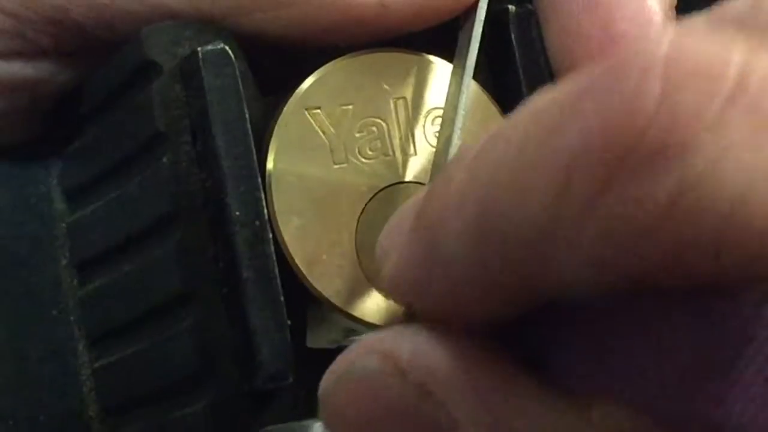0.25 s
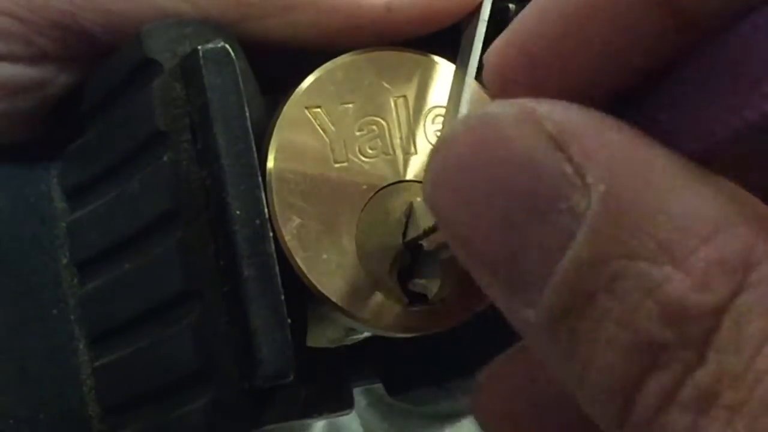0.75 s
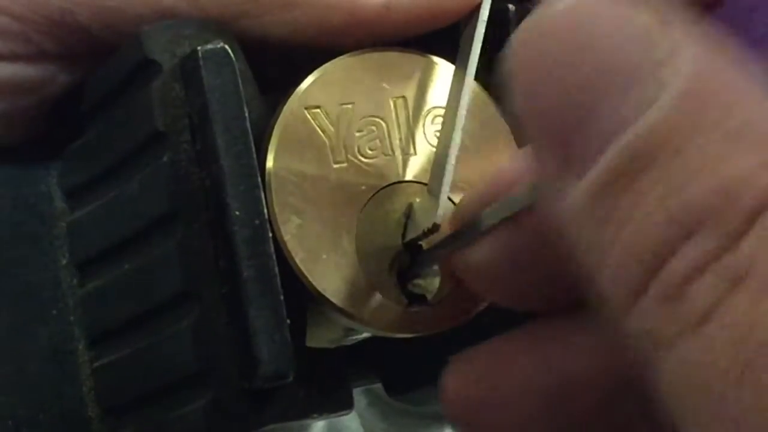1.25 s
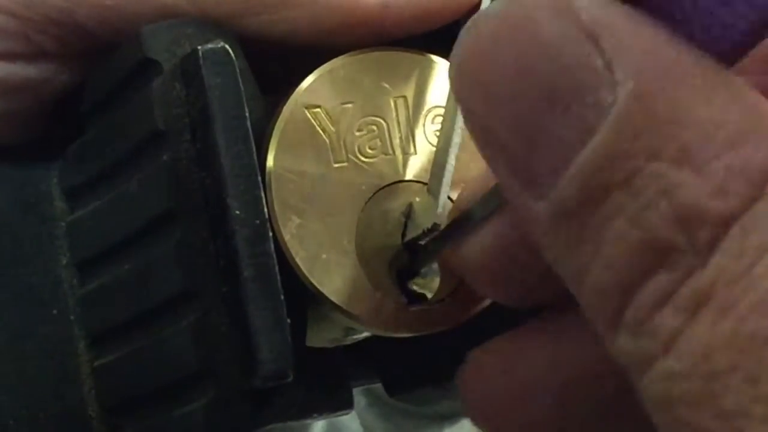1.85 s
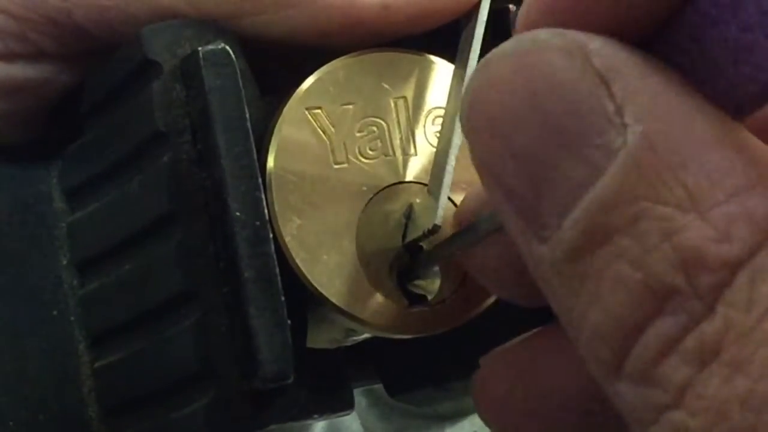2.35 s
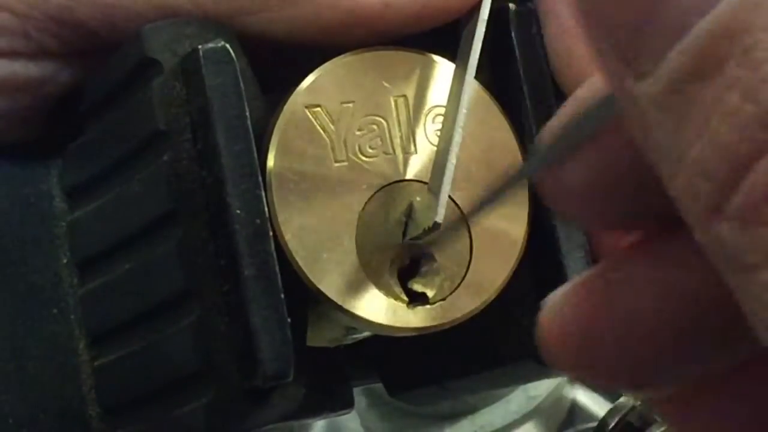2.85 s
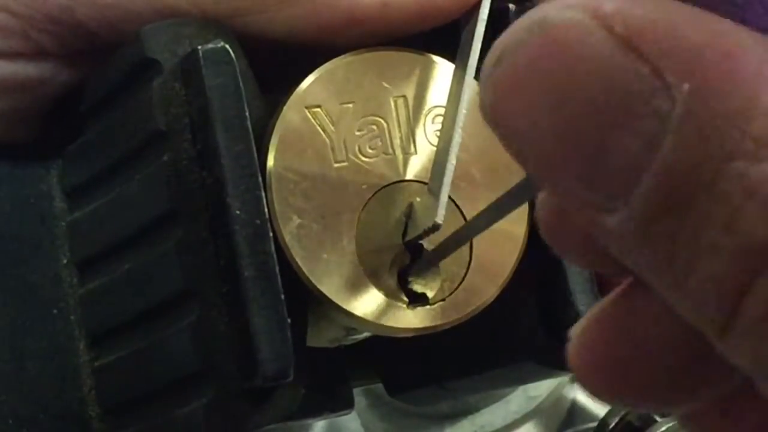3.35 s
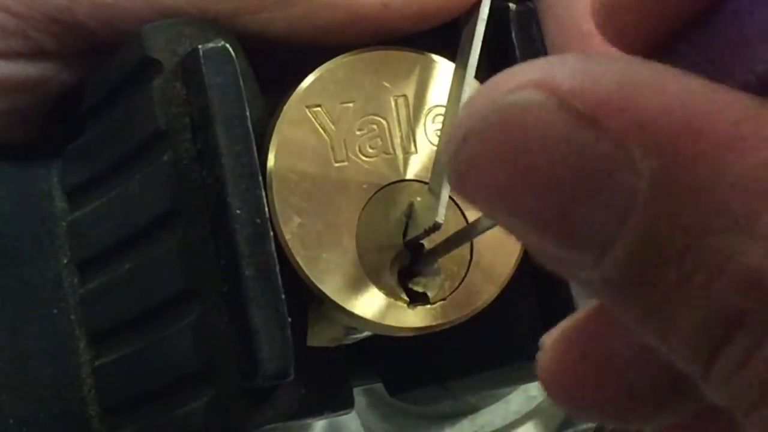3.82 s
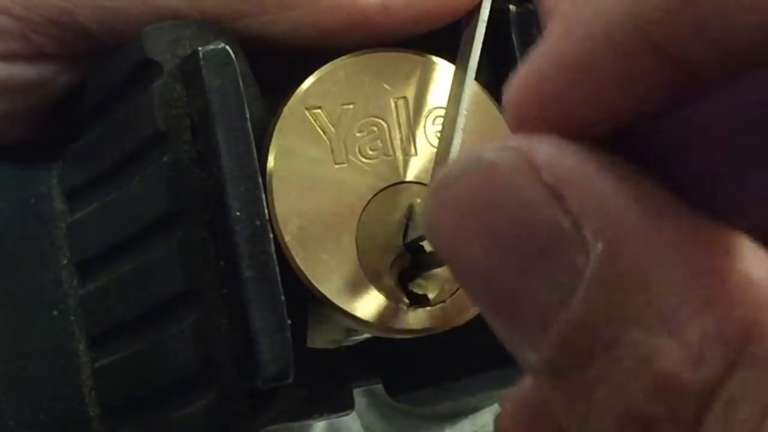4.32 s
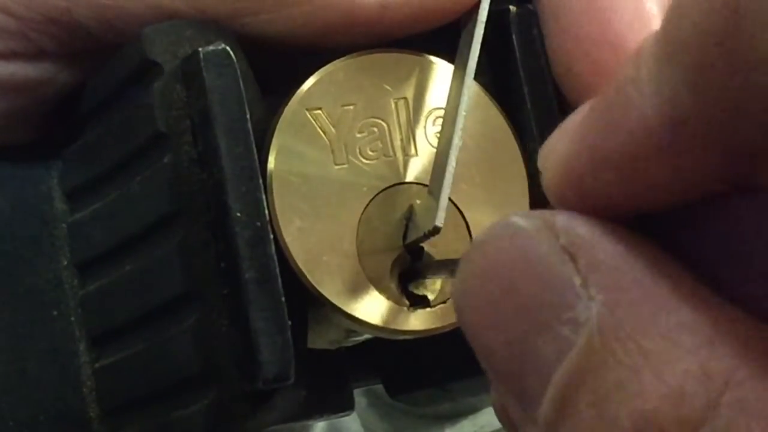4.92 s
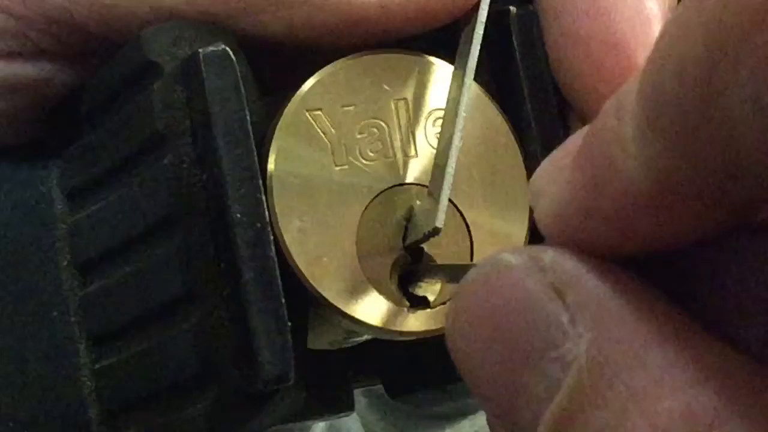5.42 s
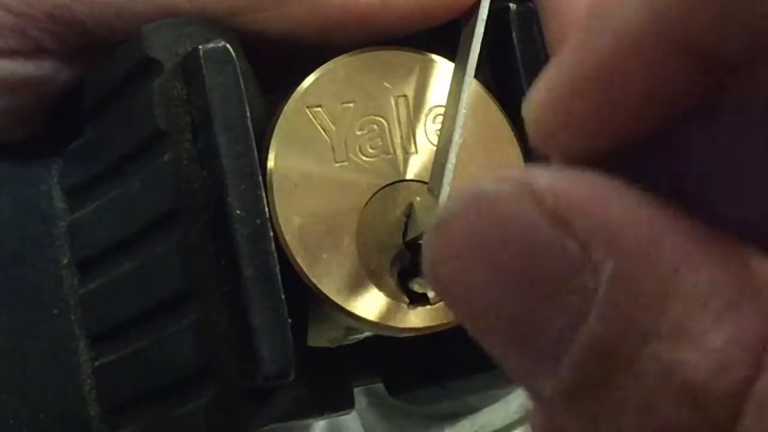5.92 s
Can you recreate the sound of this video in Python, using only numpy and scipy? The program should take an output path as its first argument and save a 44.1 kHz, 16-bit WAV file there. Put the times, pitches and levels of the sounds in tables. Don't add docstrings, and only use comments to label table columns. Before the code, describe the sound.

Close, dry metallic ticks and sharp pin snaps from a lock being picked, sparse and uneven, above faint steady hum and soft hiss.

```python
import sys
import numpy as np
from scipy import signal
from scipy.fft import rfft, irfft, next_fast_len
from scipy.io import wavfile
from scipy.ndimage import uniform_filter1d, map_coordinates

SR = 44100
rng = np.random.default_rng(int(sys.argv[2]) if len(sys.argv) > 2 else 0)


def file_out(sig):
    cols = np.atleast_2d(sig).T
    lim = np.clip(cols, -1, 1)
    pcm = np.round(lim * 32767).astype(np.int16)
    wavfile.write(sys.argv[1], SR, pcm)


def rack_gain(trim_db):
    fader = np.asarray(trim_db, float)
    return 10 ** (fader / 20)


N = 272097

# start in seconds, peak in dB, chatter in dB, chatter
# t60 in seconds, room answer in dB.
SNAPS = [(0.4115, -28.5, -24, .008, -21), (0.7372, -24.5, -28, 0.006, -19), (2.2009, -25, -22, 0.013, -22),
         (2.5618, -15, -27, 0.007, -22), (2.9838, -31.5, -25, 0.008, -23), (4.2066, -26.5, -24, 0.009, -19),
         (4.7535, -19.5, -25, 0.01, -23)]
MORE_SNAPS = [(3.2835, -35, -28.5, .006, -26), (3.3076, -28.5, -14, 0.0099, -34),
              (3.7416, -15.5, -22, 0.0068, -16), (3.7433, -10.5, -19, 0.0089, -30),
              (3.7906, -31.5, -18, 0.007, -24), (3.7936, -32.5, -24, .007, -27),
              (4.4323, -59.5, -22, 0.0056, -21)]
# resonance in Hz, width in Hz, level in dB.
STACKS = [
    [(2990, 200, -19), (3900, 200, -15), (4800, 200, -23), (6930, 290, -5.5), (8370, 300, -10),
     (9800, 340, -8), (10900, 400, -7), (12400, 650, -9), (13400, 300, -13), (14500, 360, -7),
     (15400, 550, 0)],
    [(3100, 180, -8), (3680, 340, -1.5), (7540, 740, -19), (9170, 1200, 5.5), (10600, 340, -2),
     (14070, 1100, 1), (15200, 900, -10)],
    [(2680, 230, 6.5), (2915, 150, 13), (4700, 210, -15), (5480, 310, 8.5), (5940, 320, 7.5),
     (6900, 300, -12), (8570, 500, -2), (9830, 350, -4), (10400, 370, -5.5), (11140, 440, 4),
     (11700, 490, 1), (12540, 500, 5), (13490, 400, -5), (15300, 390, -9)],
]
LATER_STACKS = [
    [(1925, 210, -15), (2950, 280, -14.5), (5500, 200, -7.5), (7275, 240, -13.5), (8520, 360, -14),
     (10560, 610, -8.5), (11640, 620, -8), (12000, 520, 2.5), (13100, 240, -19), (15200, 280, -24)],
    [(1530, 110, -5), (4370, 220, -15.5), (6730, 240, -5), (9000, 560, -11), (11200, 600, -11),
     (11850, 340, -20), (13350, 440, -14), (15450, 1330, -18.5)],
    [(2940, 570, -19), (5600, 440, -10), (7000, 650, 8.5), (8200, 520, 1), (11300, 540, -20),
     (15300, 860, 3), (15500, 410, 2)],
    [(1965, 180, 5), (2830, 110, 4.5), (2990, 130, 7), (4050, 190, 3), (5220, 250, 7), (6060, 200, -4),
     (7880, 150, -19), (8400, 80, 5), (9540, 640, -0.5), (10450, 260, -7.5), (10460, 220, 0),
     (12550, 750, 3.5), (14450, 400, -25), (15200, 300, -28)],
]
MORE_SNAP_STACKS = [
    [(3070, 310, -18), (7400, 300, -1), (10000, 230, -21), (11900, 350, 0), (12100, 330, -7)],
    [(3070, 150, -5), (4400, 220, -4), (6340, 420, -2), (7380, 440, 3), (7800, 350, 0), (8500, 210, 1),
     (13000, 370, -9), (14400, 370, -15), (14600, 230, -9)],
    [(6100, 1220, -3), (13840, 1580, -0.5)],
    [(1960, 140, -25), (3050, 230, -7), (4140, 270, -10), (7100, 540, -3.5), (8060, 940, 4.5),
     (11940, 340, -7), (12500, 570, -2.5), (15200, 1040, -11.5)],
    [(7360, 650, -12), (9500, 600, -2), (11900, 630, -6), (14800, 720, -9)],
    [(3550, 540, -14), (6910, 650, -10), (9480, 500, -4), (12100, 750, -11), (14840, 650, -10.5)],
    [(2800, 300, -3.5), (5350, 260, 0)],
]


def snaps():
    for event, peaks in zip(SNAPS + MORE_SNAPS, STACKS + LATER_STACKS + MORE_SNAP_STACKS):
        s, peak_db, chatter_db, chatter_t60, room_db = event
        struck = stack_ring(peaks, widen=0.98, rise_cycles=1.76)
        chance = rng.standard_normal(SR // 50)
        yield s, rack_gain(peak_db) * chattering(struck, chance, chatter_db, chatter_t60), room_db


# start in seconds,
# peak in dB.
REBOUNDS = [(.7370, -37), (2.2014, -32), (2.2011, -26), (2.201, -28.5), (2.2027, -35), (2.5614, -27.5),
            (2.5629, -31), (3.284, -39), (3.3069, -31), (3.7428, -26), (4.75404, -22), (4.7558, -38),
            (2.2043, -38), (2.5632, -26), (2.5643, -33), (3.31, -38), (3.312, -35), (3.7438, -27),
            (4.7549, -38)]


def rebounds():
    snap_times = np.array([snap[0] for snap in SNAPS + MORE_SNAPS])
    stacks = STACKS + LATER_STACKS + MORE_SNAP_STACKS
    for s, peak_db in REBOUNDS:
        nearest = stacks[np.argmin(np.abs(s - snap_times))]
        peaks = [p for p in nearest if p[0] > 6300]
        struck = stack_ring(peaks, widen=1.28, rise_cycles=1.4)
        chance = rng.standard_normal(SR // 50)
        yield s, rack_gain(peak_db) * chattering(struck, chance, chatter_db=-22, chatter_t60=0.0059), -22


def stack_ring(peaks, widen, rise_cycles):
    t = np.arange(SR // 50) / SR
    hz, width, db = np.transpose(peaks)[:, :, None]
    decay = rack_gain(db) * width * np.exp(-np.pi * widen * width * t)
    rise = (1 - np.exp(-t * hz / rise_cycles)) ** 2
    return (decay * np.sin(2 * np.pi * hz * t) * rise).sum(0) * spiked(t)


# start in seconds, peak in dB, place (0 plug, 1 pins, 2 shaft, 3 tip),
# loss in dB per part away from that place, housing in dB relative to the peak.
TAPS = [(.7354, -46, 2.7, 1, -20), (.7398, -44, 1, 8, -13.5), (.7628, -46, 1.3, 3, -8),
        (.8385, -35, 1.9, 11, -40), (.7334, -61, 0.86, 2, -15), (2.9726, -43, 1.2, 2, -24),
        (3.4855, -64, .5, 3, -8), (3.2948, -44, .8, 12, -26), (3.3055, -46, 2.8, 6, -24),
        (3.99, -53, 4.5, 3, -6), (3.4112, -40, 2.2, 6, -36), (3.416, -43, 1, 18, -26),
        (3.4387, -38, 2.3, 7, -42), (3.5411, -41, 2.3, 7, -27), (5.966, -68, .5, 5, -1),
        (6.0, -65, 2.6, 8, -15), (3.7604, -27.5, 3.6, 2.5, -26.5), (3.7644, -32, 1.6, 2.5, -18),
        (.7925, -55, 1.5, 6, -13), (3.5517, -63, .3, 6, -9), (3.9995, -52, 0.92, -4, -11.5),
        (4.2043, -37, 2.2, 2, -27), (4.4325, -67, .1, 6, -3), (4.4583, -69, .1, 1, 11)]
# start in seconds, peak in dB, place (as for taps), housing in dB.
CATCHES = [(0.4134, -53, 1.5, -5), (0.7994, -47, 1.1, -26), (.8045, -47, .5, -26), (0.816, -47, .8, -21),
           (1.399, -55, 2.3, -14), (1.6085, -59, 1.9, -13), (2.8301, -60, 1.6, -22), (2.8, -49, 2.1, -21),
           (2.8066, -42, 2.1, -19), (2.813, -46, 1.9, -20), (2.8218, -40, 2.2, -28),
           (2.8367, -38, 2.1, -37), (2.8503, -36, 2.3, -38), (2.8524, -42, 2.1, -30),
           (2.8583, -43, 2.1, -38), (2.8657, -58, 1.5, -21), (2.87, -52, 1.3, -8), (2.8772, -43, 1.6, -12),
           (3.312, -44, 1.6, -17), (3.7544, -38, 2.2, -23), (3.7582, -43, 1.5, -13),
           (4.0055, -40, 2.1, -16), (4.007, -51.5, .9, -5), (4.037, -47, 1.9, -18), (4.2124, -47, .1, -17),
           (6.0412, -47.5, 0.43, -13), (6.0566, -58, .1, -4), (6.0904, -44, 2.6, -26),
           (6.0934, -44, 2.2, -22), (6.165, -55, 1.1, -19), (.8142, -51, 1.4, -17), (.832, -56, .9, -17),
           (2.7945, -58, 2.9, -18), (2.8345, -51, 2.2, -30), (2.855, -50, 2.1, -25),
           (3.3028, -50, 3.1, -25), (3.4137, -52, 1.6, -24), (3.441, -56, .7, -22),
           (3.7675, -43, 1.2, -10.5), (6.011, -66, .1, -15), (6.098, -60, 2.1, -12),
           (6.1457, -61, 2.7, -20), (6.155, -57, .2, -20), (6.1685, -52, 1.9, -11), (2.838, -43, .3, -29),
           (2.8506, -51, .2, -22), (2.8064, -52, .1, -20), (6.0414, -54, 3.2, -30)]


def light_contacts():
    rows = TAPS + [(s, db, place, 10.5, housing_db) for s, db, place, housing_db in CATCHES]
    contacts = []
    for s, peak_db, place, loss_db, housing_db in rows:
        parts_db = peak_db - loss_db * np.abs(np.arange(4) - place)
        contacts.append((s, peak_db + housing_db, *parts_db))
    return contacts


# mode in Hz, level in dB, t60 in seconds.
HOUSING = [(1950, -0.5, 0.037), (2990, 10, 0.0077), (4200, 7.5, 0.0077)]
PLUG = [(5556, 1.5, 0.0055), (6830, 3.5, 0.011), (7140, 4, 0.012)]
PINS = [(7880, -1.5, 0.0037), (8330, -0.5, 0.0036), (9750, -4.5, 0.0032)]
SHAFT = [(10870, -7.5, 0.0018), (11650, 4.5, 0.0039), (12520, 4, 0.0035)]
TIP = [(13730, 1, 0.0022), (14300, -2.04, 0.003), (15660, 0.5, 0.0022)]


def taps():
    parts = (HOUSING, PLUG, PINS, SHAFT, TIP)
    rises_s = (0.00062, 0.00017, 0.00032, 0.000077, 0.000062)
    for s, *levels_db in light_contacts():
        sound = 0
        for modes, db, rise_s in zip(parts, levels_db, rises_s):
            chance = rng.standard_normal(6 + SR // 50)
            struck = ring(modes, chance, rise_s, detune=0.023, scatter_db=2.5)
            sound = sound + rack_gain(db + 1.5) * chattering(struck, chance, chatter_db=-19, chatter_t60=0.0076)
        yield s, sound, -22


def ring(modes, chance, rise_s, detune, scatter_db):
    t = np.arange(SR // 50) / SR
    hz, db, t60 = np.transpose(modes)[:, :, None]
    pitch, size = chance[:6].reshape(2, 3, 1)
    decay = rack_gain(db + scatter_db * size - 60 * t / t60)
    each = decay * np.sin(2 * np.pi * hz * (1 + detune * pitch) * t)
    rise = (1 - np.exp(-t / rise_s)) ** 2
    return each.sum(0) * spiked(t) * rise


def spiked(t):
    return 1 + rack_gain(4) * np.exp(-(t / .00025) ** 2)


def chattering(sound, chance, chatter_db, chatter_t60):
    force = rack_gain(chatter_db - 60 * np.arange(len(chance)) / SR / chatter_t60) * chance
    x = np.convolve(np.append(1, force), sound)
    return x / np.abs(x).max()


def clicks():
    dry, wet = np.zeros((2, N + SR))
    for s, blow, room_db in [*taps(), *snaps(), *rebounds()]:
        start = round(s * SR)
        crack = blow * rack_gain(-60 * np.arange(len(blow)) / SR / 0.0043)
        answer = signal.fftconvolve(crack, room_tail(delay_s=.006))
        answer *= np.linalg.norm(blow) / np.linalg.norm(crack)
        dry[start:][:len(blow)] += blow
        wet[start:][:len(answer)] += rack_gain(room_db - 1.5) * answer
    return dry[:N], wet[:N]


# start in seconds, length in seconds,
# scrape in dB at the start, gain in dB by the end, pick in dB over the brass.
STROKES = [(0.7332, .011, -58, 1, -3), (0.742, 0.1, -65, -3.5, -7), (1.3, .03, -82, -1, 3),
           (1.373, .025, -83, -2.5, 7.5), (1.585, .03, -86, 3, 3), (2.789, .042, -73.5, 9, 9),
           (2.851, 0.025, -60.5, -1, 7.5), (2.537, 0.026, -79.5, 8, 1), (2.979, 0.01, -71.5, 7, -5),
           (3.282, 0.021, -65.5, 7, 3), (3.298, 0.0144, -64.5, 2, -4), (3.411, 0.006, -53.5, -5, 5.5),
           (3.437, 0.057, -70, -14.5, 3.5), (3.749, .008, -65, -10, -6.5), (3.752, 0.016, -60.5, 8, 1.5),
           (3.771, .02, -84.5, -8.5, 11), (3.79, .007, -69, -3, 6), (3.974, 0.03, -81.5, 22.5, 6.5),
           (4.004, .03, -60, -17, -2), (4.203, 0.0063, -63, 2.5, 1.5), (4.211, 0.014, -64, -13, 1),
           (5.994, 0.041, -84, 1, 8.5), (6.043, 0.055, -72.5, 1, -2), (6.135, 0.038, -77, 13.5, 5),
           (2.57, 0.046, -69.5, -10.5, -6), (3.542, .015, -74, -6, -1)]
# housing in dB, plug in dB.
BEARING = [(-8, -7), (-8.5, -12), (-11, -2.5), (-11, -4), (-11, -1), (-11, -1), (-11, 0), (-1.5, 0.5),
           (-12, -1), (-12, -2), (-7, -1), (-14, -2.5), (-15, -1), (-13, -7), (-5, -6), (-10, -4),
           (-11, -1), (-8, 1), (-6, -0.5), (-4.5, -4), (-9, -8), (-9, 2), (-6, 1.5), (-15, 1), (-9, 2.5),
           (-9, 5)]


def pressure():
    t, gains = np.arange(N) / SR, np.zeros((4, N))
    grip_s, lift_s, fade_db = .002, .004, 16
    for (s, length, db, gain_db, pick_db), (housing_db, plug_db) in zip(STROKES, BEARING):
        corners = np.cumsum([s - grip_s, grip_s, length, lift_s])
        span = slice(int(corners[0] * SR), int(corners[-1] * SR))
        end_db = db + gain_db
        force = rack_gain(np.interp(t[span], corners, [db - fade_db, db, end_db, end_db - fade_db]))
        gains[:, span] += rack_gain([[housing_db], [plug_db], [-3], [pick_db]]) * force
    return gains


def slips(rate, spread_db):
    when, size, sign = rng.random((3, N))
    return (when < rate / SR) * rack_gain(-spread_db * np.log(size + 1e-4)) * (sign - .5)


def grit(rate, spread_db, stutter_rate):
    return unit(slips(rate, spread_db) * rack_gain(1.5 * wobble(stutter_rate)))


# mode in Hz, level in dB, t60 in seconds.
KEYWAY = [(5570, 2, 0.0031), (6800, 4.5, 0.00307)]
# centre in Hz, width in Hz, depth from 0 to 1.
PORT_NOTCH = (10400, 980, 0.54)


def scrape():
    common = grit(rate=3300, spread_db=2.2, stutter_rate=160)
    dry = np.zeros(N)
    for gain, modes in zip(pressure(), (HOUSING, KEYWAY, PINS, SHAFT + TIP)):
        own = grit(rate=11000, spread_db=3.0, stutter_rate=120)
        blurred = resonances([(hz, 2.5 / t60, db) for hz, db, t60 in modes])
        voice = filtered(common + own, blurred)
        dry += gain * patchy(voice, size=128, bins=4, frames=9, depth_db=2.8)
    hz, width, depth = PORT_NOTCH
    dry = filtered(dry, lambda f: 1 - depth * resonances([(hz, width, 0)])(f))
    return dry + rack_gain(-21.0) * signal.fftconvolve(dry, room_tail(delay_s=0.0065))[:N]


# frequency in Hz, level in dB.
ECHO = [(1500, 7), (2200, 11.5), (3000, 8), (5500, 1), (7000, -4.5), (8700, -2), (10400, -4.5), (12200, -2),
        (14500, -6.5)]
# frequency in Hz, t60 in seconds.
ROOM = [(1500, 0.15), (5000, 0.15), (9000, .18), (12500, 0.087), (16000, 0.098)]


def room_tail(delay_s):
    hz, t, z = signal.stft(rng.standard_normal(SR // 6), SR, nperseg=128)
    level_db = along(ECHO, hz)[:, None] - 60 * t / along(ROOM, hz)[:, None]
    tail = signal.istft(z * rack_gain(level_db), SR, nperseg=128)[1]
    tail *= 1 - np.exp(-(np.arange(len(tail)) / SR / delay_s) ** 2)
    return rack_gain(9.5) * tail / np.linalg.norm(tail)


# resonance in Hz, width in Hz, level in dB.
CASING = [(508, 35.4, -12.5), (600.6, 30, -7), (675.8, 20.6, -1.5), (758.6, 29.2, 1), (790, 21.7, 3),
          (831.3, 37.3, -2), (909.4, 45.4, -4), (932.5, 28, 1), (968.5, 22.8, 0.5), (1029.4, 38.7, -3),
          (1142, 29, -5.5), (1265, 62, -10.5), (1525, 31, -18), (1954, 94, -25.5)]
# frequency in Hz, rms level in dB.
WHINE = [(1274, -69), (1773, -82.5)]
# time in seconds, level in dB.
THROB = [(0.0, -60), (1.27, -67.5), (1.31, -62.5), (1.89, -60.5), (1.96, -66), (3.01, -61.5), (3.08, -69),
         (3.21, -60), (3.76, -57.5), (3.81, -67), (3.95, -55.5), (4.23, -74), (4.26, -62.5), (5.34, -60.5),
         (5.55, -69), (5.6, -60), (5.69, -73), (6.17, -59.5)]


def fan():
    t = np.arange(N) / SR
    sound = rack_gain(-53 + .7 * wobble(8.7)) * noise(resonances(CASING))
    for hz, db in WHINE:
        level = rack_gain(db + 1.0 + 3.7 * wobble(6.1))
        sound += level * np.sin(2 * np.pi * hz * t + .5 * wobble(5.7))
    throb = np.sin(2 * np.pi * 52 * t + 0.6 * wobble(4.2)) * rack_gain(2.5 + 1.4 * wobble(28))
    throb += rack_gain(-6.5) * noise(lambda hz: resonances([(50, 22, 0)])(hz) ** 3)
    return sound + level_curve(THROB) * throb


# time in seconds, level in dB.
SWELL = [(0.0, -70), (2.65, -68.5), (3.02, -70), (3.61, -65), (4.4, -68), (5.91, -71), (6.17, -66)]
# frequency in Hz, density in dB per Hz.
RUMBLE = [(36, -33.5), (62, -11.5), (81, -7.5), (129, -9.5), (162, -16), (215, -11), (253, -15),
          (324, -11.5), (371, -16.5), (460, -14), (480, -17.5), (620, -37), (1060, -120)]
# frequency in Hz, density in dB per Hz.
HISS = [(1000, -35), (1600, -2), (1860, -10), (2480, -13), (2940, -14), (4830, -21), (5900, -19),
        (9500, -23), (10400, -29), (11300, -24), (15600, -27)]


def floor():
    air = noise(lambda hz: rack_gain(along(RUMBLE, hz)))
    air = patchy(air, size=2048, bins=4, frames=4, depth_db=2.2)
    rumble = level_curve(SWELL) * rack_gain(2.5 + 1.2 * wobble(7)) * air
    return rumble + rack_gain(-73.5) * noise(lambda hz: rack_gain(along(HISS, hz)))


def unit(x):
    return x / np.sqrt(np.mean(x ** 2) + 1e-20)


def along(points, hz):
    f, v = np.transpose(points)
    return np.interp(np.log(hz + 1), np.log(f + 1), v)


def level_curve(rows):
    s, db = np.transpose(rows)
    return rack_gain(np.interp(np.arange(N) / SR, s, db, -120, -120))


def wobble(rate):
    knots = rng.standard_normal(int(N * rate / SR) + 4)
    return map_coordinates(knots, [np.arange(N) * rate / SR])


def filtered(x, response):
    m = next_fast_len(N + SR // 2)
    return irfft(rfft(x, m) * response(np.fft.rfftfreq(m, 1 / SR)), m)[:N]


def resonances(peaks):
    def response(f):
        total = 0
        for k, (hz, width, db) in enumerate(peaks):
            damping = 1j * f * width
            total = total + (-1) ** k * rack_gain(db) * damping / (hz * hz - f * f + damping)
        return total
    return response


def noise(response):
    m = next_fast_len(N)
    spectrum = rfft(rng.standard_normal(m)) * response(np.fft.rfftfreq(m, 1 / SR))
    return unit(irfft(spectrum, m)[:N])


def patchy(x, size, bins, frames, depth_db):
    z = signal.stft(x, nperseg=size)[2]
    field = uniform_filter1d(rng.standard_normal(z.shape), bins, axis=0)
    field = uniform_filter1d(field, frames, axis=1)
    return unit(signal.istft(z * rack_gain(depth_db * unit(field)), nperseg=size)[1][:N])


def scene():
    contacts, echoes = clicks()
    steady = filtered(echoes + scrape() + fan() + floor(), lambda hz: hz < 15750)
    return (contacts + steady)[None]


def low_pass(x):
    return signal.sosfilt(signal.butter(12, 17100, fs=SR, output="sos"), x)


def record(dry):
    limited = filtered(dry[0], lambda hz: np.clip((17050 - hz) / 1100, 0, 1))[None]
    return low_pass(limited)


dry = scene()
out = record(dry)
file_out(out)
```